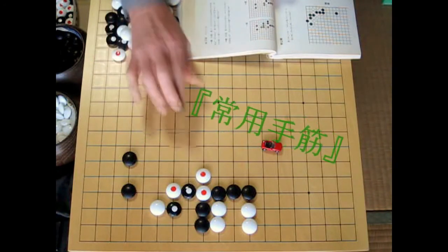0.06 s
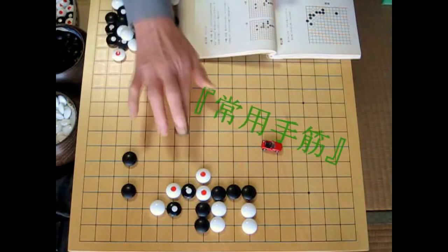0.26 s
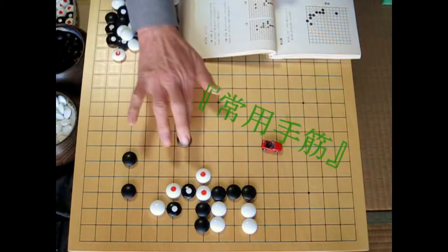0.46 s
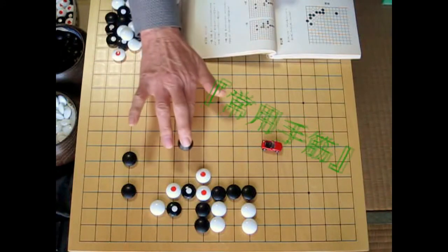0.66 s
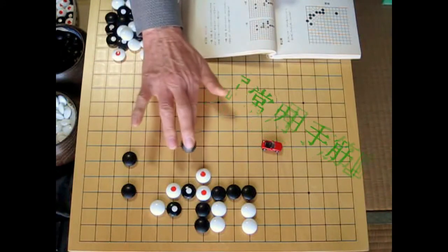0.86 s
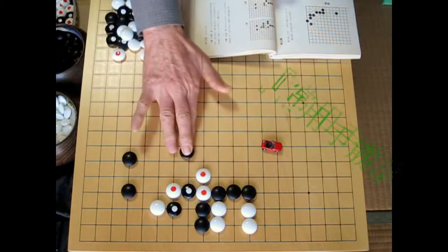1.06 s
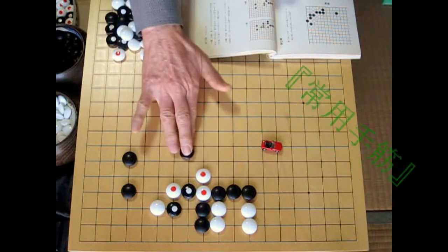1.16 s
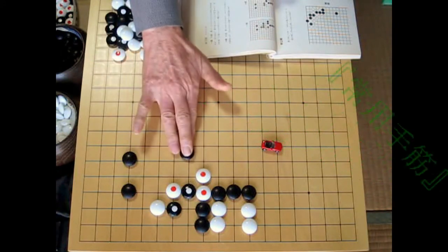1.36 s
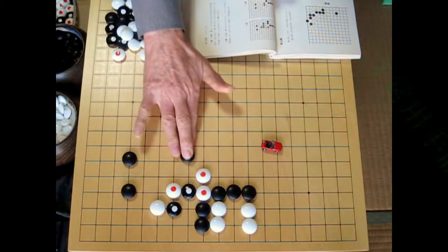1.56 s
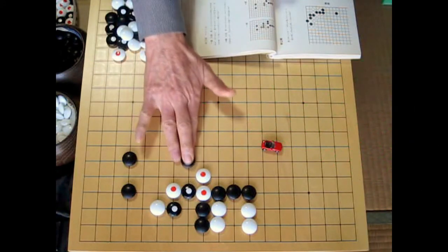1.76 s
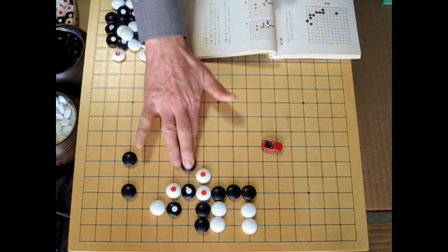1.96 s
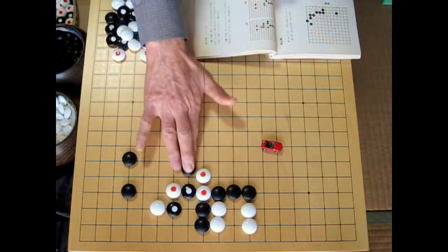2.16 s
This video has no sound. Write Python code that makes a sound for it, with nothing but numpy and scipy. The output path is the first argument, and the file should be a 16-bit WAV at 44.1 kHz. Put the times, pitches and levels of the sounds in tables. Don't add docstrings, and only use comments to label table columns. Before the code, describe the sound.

A go stone clacks once, loud and sharp, onto a thick wooden board in a quiet room

```python
import sys
import numpy as np
from scipy import signal
from scipy.fft import irfft
from scipy.io import wavfile
from scipy.ndimage import uniform_filter1d

SR = 44100
rng = np.random.default_rng(int(sys.argv[2]) if len(sys.argv) > 2 else 0)


def how_loud(loudness_db):
    steps = np.asarray(loudness_db, float) / 20
    return 10 ** steps


def wav_record(signal):
    frames = np.transpose(np.atleast_2d(signal))
    bounded = np.clip(frames, -1, 1)
    quanta = np.round(bounded * 32767).astype(np.int16)
    wavfile.write(sys.argv[1], SR, quanta)


N = 97857

HIT_S, HIT_DB = 0.96657, 11.5
BUILD_UP_S = 0.0094


def evened(x):
    return x / np.sqrt(np.mean(x ** 2) + 1e-20)


def read(points, hz):
    f, value = np.transpose(points)
    return np.interp(np.log(hz + 1), np.log(f + 1), value)


def spikes(times, sizes, blur=0.):
    hz = np.fft.rfftfreq(N, 1 / SR)
    blur = blur * np.ones(len(times))
    spectrum = sum(size * np.exp(-2j * np.pi * hz * at - (np.pi * hz * width) ** 2)
                   for at, size, width in zip(times, sizes, blur))
    return irfft(spectrum, N)


def placed(sound, at):
    return signal.fftconvolve(at, sound)[:N]


def ring(hz, db, t60, t):
    return how_loud(db - 60 * t / t60) * np.sin(2 * np.pi * hz * t)


# f/Hz, level/dB, t60/s
BOARD_MODES = [(227.6, -14.5, 0.018), (548, -15, 0.013), (796.3, -22.5, 0.013), (1273, -8.5, 0.022),
               (1633, -12, 0.049), (2123, -17, .035), (2647, -13, 0.075), (3124, -6, 0.012),
               (3603, -10, .025), (4413, -15, 0.038), (5054, -18.5, 0.031)]


def clack():
    contact_s = 0.00023
    t = np.arange(8192) / SR
    push = t * np.exp(-t / (contact_s / 4))
    push = (push / push.sum())[:200]
    crack = np.convolve(ring(3130, 7, 0.0026, t), push)[:8192]
    board = np.convolve(sum(ring(*mode, t) for mode in BOARD_MODES), push)[:8192]
    return how_loud(HIT_DB) * crack, how_loud(HIT_DB) * board


BOUNCE_DELAYS = [.0007, .0014, .0023, .0038, .0063, .0080, .0102, .0119, .0130]
# level/dB, signed share of crack/1, share of board ring/1, dullness/s
BOUNCES = [
    (-6.5, -.9, 0.2, 0.000036),
    (-6.5, -0.14, .05, .00005),
    (-8, .9, 0.4, .0001),
    (-1.5, .9, 0.9, .00012),
    (0.5, .9, 0, 0.0000067),
    (-8, -0.3, .2, 0.000017),
    (-8, .9, 0, .00005),
    (-6.5, 0.22, 0.1, .0001),
    (-6.5, .9, .2, .0001),
]


def direct_and_bounces():
    crack, board = clack()
    db, crack_share, board_share, blur = np.transpose(BOUNCES)
    at = HIT_S + np.array(BOUNCE_DELAYS)
    out = placed(crack + board, spikes([HIT_S], [1]))
    out = out + placed(crack, spikes(at, how_loud(db) * crack_share, blur))
    out = out + placed(board, spikes(at, how_loud(db) * board_share, blur))
    out = signal.sosfilt(signal.butter(2, 190, "high", fs=SR, output="sos"), out)
    return signal.sosfilt(signal.butter(6, 4600, fs=SR, output="sos"), out)


# f/Hz, t60/s
ROOM_DECAY = [(100, 0.29), (220, 0.32), (500, 0.59), (1000, 0.66), (2000, 0.68), (3500, 0.5), (6000, .33),
              (9000, .3)]
# f/Hz, level/dB
ROOM_COLOUR = [(80, -19.5), (200, -10.5), (400, -14), (700, -6), (1800, -6), (4200, -12.5), (5500, -28),
               (9000, -39)]


def diffuse_tail():
    taps = np.zeros(SR)
    at = np.arange(0, SR - 12, 12)
    taps[at + rng.integers(0, 12, len(at))] = rng.choice([-1., 1.], len(at))
    hz, t, z = signal.stft(taps, SR, nperseg=256)
    decay_db = read(ROOM_COLOUR, hz)[:, None] - 60 * t / read(ROOM_DECAY, hz)[:, None]
    tail = signal.istft(z * how_loud(decay_db), SR, nperseg=256)[1]
    t = np.arange(len(tail)) / SR
    tail = tail * np.clip(t / BUILD_UP_S, 0, 1)
    return how_loud(23.5) * tail / np.linalg.norm(tail)


# f/Hz, level/dB, t60/s
ROOM_MODES = [(216, -28, 0.25), (510, -30, 0.44), (858, -29, .5), (991, -26.5, .5), (1260, -27.5, .55),
              (1610, -27.5, .5), (1810, -25, .6), (2060, -27.5, .5), (2300, -26, 0.57), (2600, -31, 0.61),
              (2850, -33, 0.46), (2918, -33, .4)]


def standing_waves():
    t = np.arange(SR) / SR
    modes = np.zeros(SR)
    for hz, db, t60 in ROOM_MODES:
        for detune in (1, rng.uniform(1.005, 1.02)):
            modes = modes + ring(hz * detune, db, t60, t) * rng.choice([-1, 1])
    return how_loud(HIT_DB) * modes * np.clip(t / BUILD_UP_S, 0, 1)


def stone():
    tail = diffuse_tail()[:SR] + standing_waves()
    tail_delay_s = 0.0052
    return direct_and_bounces() + placed(tail, spikes([HIT_S + tail_delay_s], [1]))


def touch():
    start_s, length_s, centre_hz = 0.928, 0.03, 2000
    t = np.arange(3000) / SR
    band = signal.butter(2, [centre_hz * .9, centre_hz * 1.1], "band", fs=SR, output="sos")
    rub = evened(signal.sosfilt(band, rng.standard_normal(3000)))
    rub = how_loud(-55) * rub * np.sin(np.pi * np.clip(t / length_s, 0, 1))
    return placed(rub, spikes([start_s], [1]))


# f/Hz, rms level/dB, throb share/1
WHINES = [(8909, -70, .99), (7865, -82, .1)]


def electronics():
    cycle_hz, first_tick_s = 15., 0.0170
    dip_s, dip_db, sag_s, sag_db = 0.0135, -7.5, 0.019, -2
    t = np.arange(N) / SR
    left = (first_tick_s + 1 / 1000 - t) % (1 / cycle_hz)
    throb_db = np.where(left < dip_s, dip_db, sag_db * (left < dip_s + sag_s))
    throb_db = uniform_filter1d(throb_db, size=60)
    tones = np.zeros(N)
    for hz, db, share in WHINES:
        level = np.sqrt(2) * how_loud(db + share * throb_db)
        tones = tones + level * np.sin(2 * np.pi * (hz * t + rng.random()))
    times = np.arange(first_tick_s, N / SR, 1 / cycle_hz)
    tick_width_hz = 2500
    tick = ring(4500, -41, 2.2 / tick_width_hz, t[:200])
    sizes = how_loud(2.5 * rng.standard_normal(len(times)))
    return tones + np.convolve(spikes(times, sizes), tick)[:N]


# f/Hz, level/dB per Hz
HISS = [(12, -33), (20, -2), (234, -9), (753, -17.5), (970, -17.5), (1160, -20), (4230, -29.5),
        (7390, -35.5), (8600, -42), (11200, -66), (18900, -120)]


def hiss():
    patchy_db, swell_db = 0.47, -0.7
    frames, hz = N // 256 + 5, np.fft.rfftfreq(1024, 1 / SR)
    a, b, patches = rng.standard_normal((frames, 513, 3)).T
    patches = uniform_filter1d(uniform_filter1d(patches, size=10, axis=0), size=10, axis=1)
    swell = evened(uniform_filter1d(rng.standard_normal(frames), size=6))
    capsule_db = 3.5 * np.exp(-((hz - 4450) / 340) ** 2)
    level_db = (read(HISS, hz) + capsule_db)[:, None] + patchy_db * evened(patches)
    level_db = level_db + swell_db * swell / (1 + hz[:, None] / 300)
    noise = signal.istft((a + 1j * b) * how_loud(level_db), nperseg=1024, noverlap=768)[1][:N]
    return how_loud(-51.5) * evened(noise)


def scene():
    return (stone() + touch() + electronics() + hiss())[None]


def gain_control(x):
    threshold_db, share, lag_s, recover_db_per_s = -20, 0.72, 0.011, 8.5
    t = np.arange(N) / SR
    peak_db = 10 * np.log10(abs(uniform_filter1d(x ** 2, size=100)) + 1e-12)
    fall = t * recover_db_per_s / share
    held_db = np.maximum.accumulate(peak_db + fall) - fall
    over_db = np.maximum(held_db - threshold_db, 0)
    r = np.exp(-1 / (lag_s * SR))
    return x / how_loud(share * signal.lfilter([1 - r], [1, -r], over_db))


def thinned_treble(x):
    from_hz, below_db = 7950, -97
    hz, _, z = signal.stft(x, SR, nperseg=512)
    power = uniform_filter1d(uniform_filter1d(abs(z) ** 2, size=3, axis=0), size=5, axis=1)
    local_db = 10 * np.log10(abs(power) + 1e-20)
    thin = (hz[:, None] > from_hz) * (1 - np.tanh((local_db - below_db) / 2)) / 2
    return signal.istft(z * (1 - thin), SR, nperseg=512)[1][:N]


def mirror_image(x):
    fold = np.cos(2 * np.pi * 22050 * np.arange(N) / SR)
    band = signal.firwin(255, [12900 - 500, 12900 + 400], pass_zero=False, fs=SR)
    return how_loud(-26) * signal.oaconvolve(x * fold, band, "same")


def low_pass(x):
    return signal.sosfilt(signal.butter(12, 16000, fs=SR, output="sos"), x)


def record(dry):
    ceiling = 0.975
    x = np.clip(gain_control(dry[0]), -ceiling, ceiling)
    x = signal.oaconvolve(x, signal.firwin(511, 9450, window=("kaiser", 9), fs=SR), "same")
    x = thinned_treble(x)
    x = x + mirror_image(x) + how_loud(-97) * rng.standard_normal(N)
    return low_pass(np.clip(x, -1, 1)[None])


dry = scene()
out = record(dry)
wav_record(out)
```